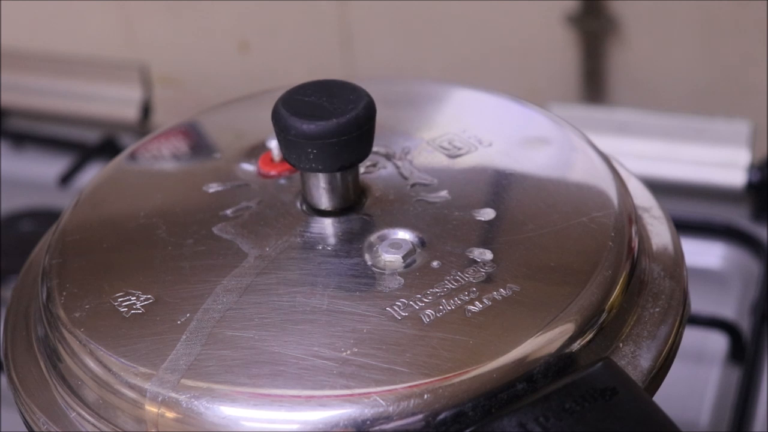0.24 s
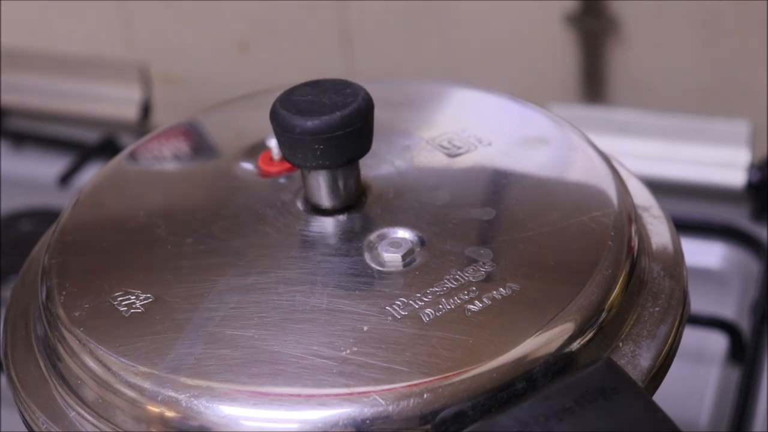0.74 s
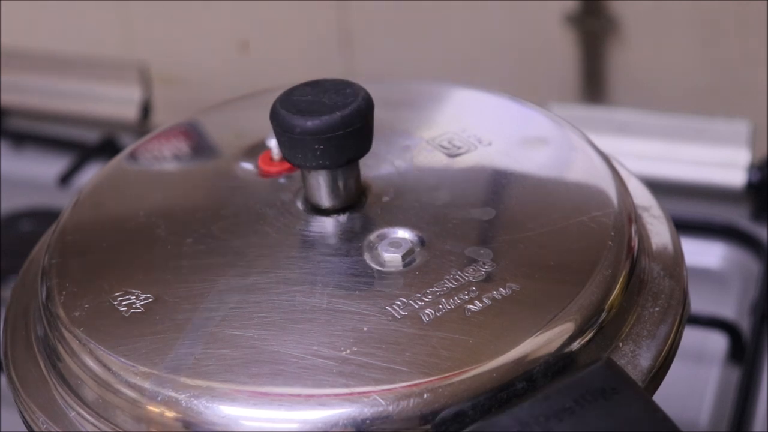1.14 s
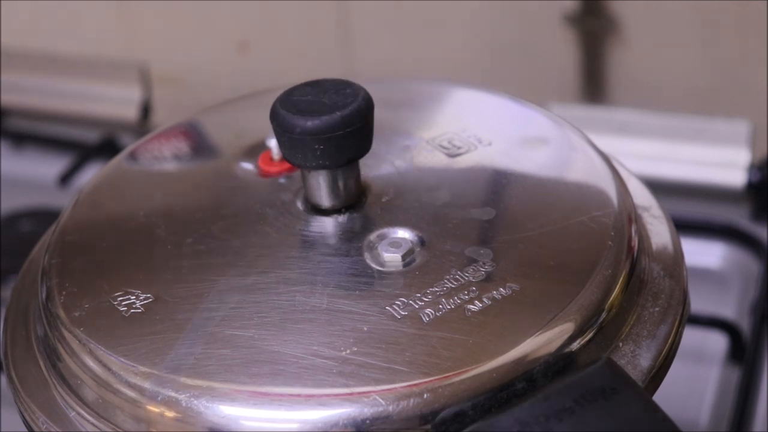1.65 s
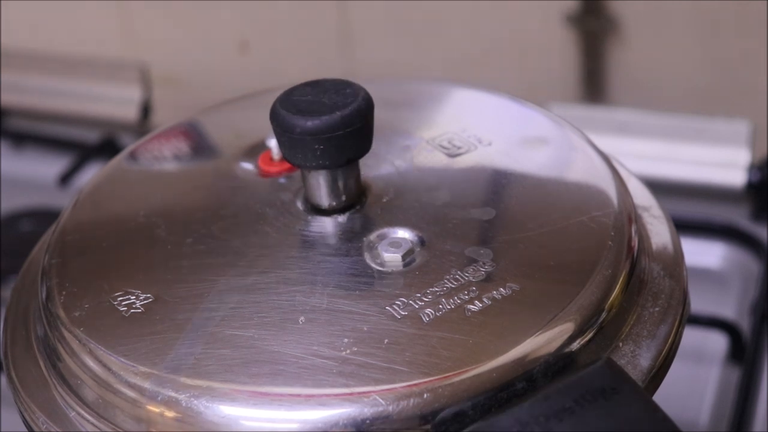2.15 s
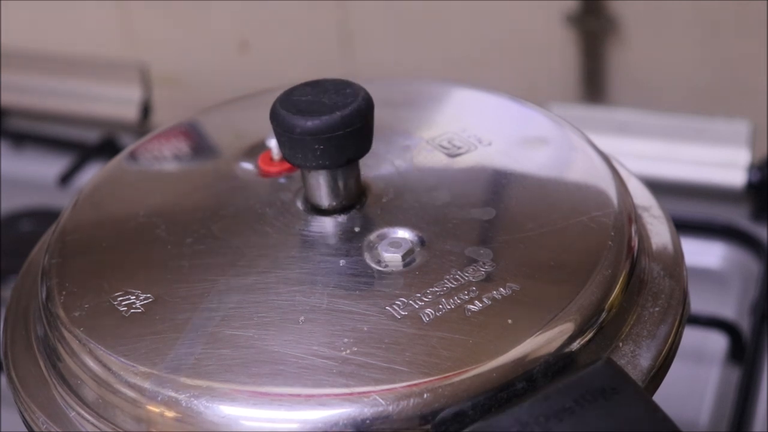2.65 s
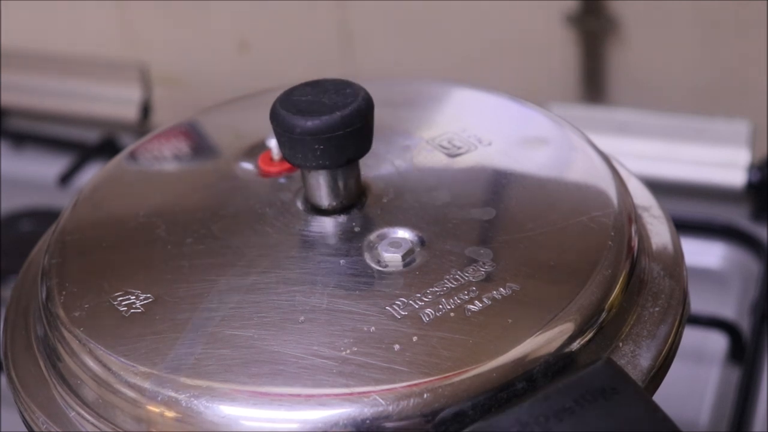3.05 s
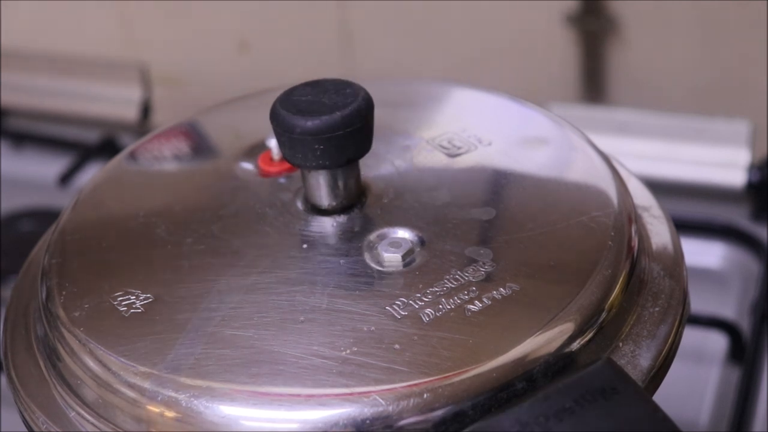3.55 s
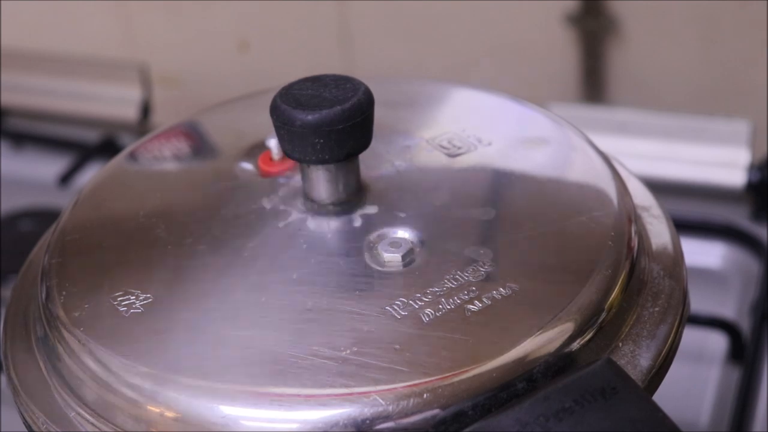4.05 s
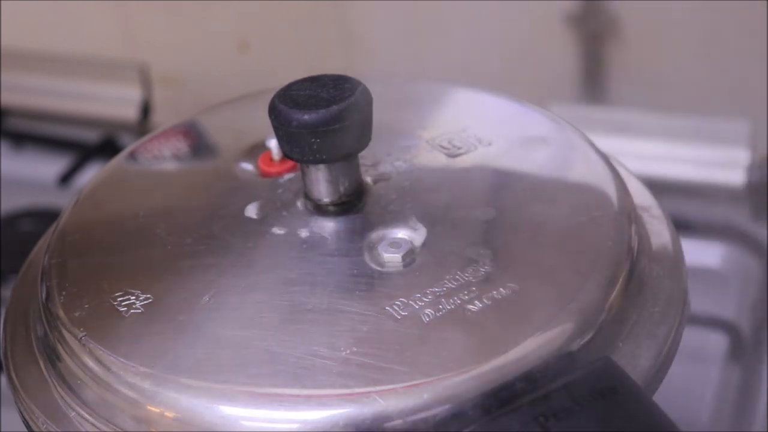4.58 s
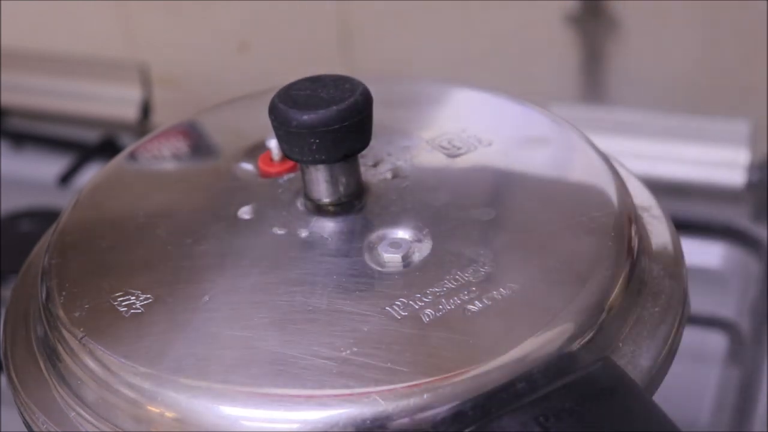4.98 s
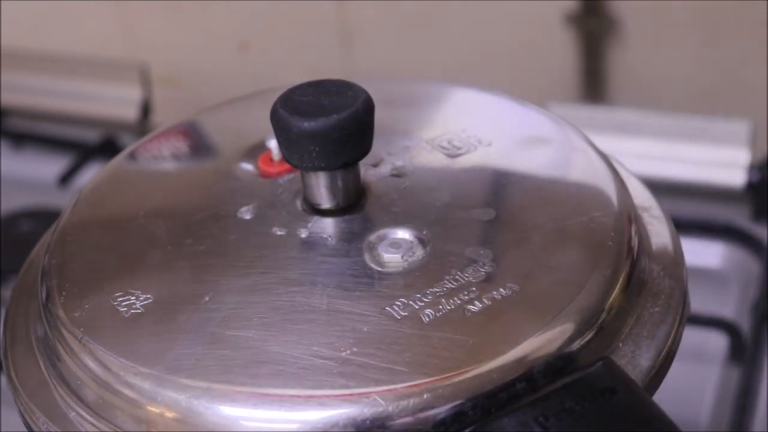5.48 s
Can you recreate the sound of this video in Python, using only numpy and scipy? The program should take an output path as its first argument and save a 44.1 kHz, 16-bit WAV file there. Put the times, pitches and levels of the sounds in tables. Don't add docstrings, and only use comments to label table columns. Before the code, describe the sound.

In a small tiled kitchen, burner roar, fan hum and faint simmer play briefly before a loud steam hiss cuts in abruptly. It flutters as the pressure cooker weight rocks rapidly. The weight lifts with a clunk and low thump, releasing a wet, fuller blast while the background ducks. It then drops, rattles lightly on the lid, and the hiss shrinks to a thin leak. Close stereo microphone.

```python
import sys
import numpy as np
from scipy import signal
from scipy.fft import rfft, irfft
from scipy.io import wavfile
from scipy.ndimage import uniform_filter1d

SR = 44100
rng = np.random.default_rng(int(sys.argv[2]) if len(sys.argv) > 2 else 0)


def magnitude_from_level(level_db):
    exponent = np.asarray(level_db, float) / 20
    return 10 ** exponent


def pcm_store(signal):
    levels = np.round(np.clip(np.atleast_2d(signal), -1, 1) * 32767)
    wavfile.write(sys.argv[1], SR, levels.astype(np.int16).T)


N = 252252
HOP = 128
SCENE_CHANGE_S = 0.3925


def evened(x):
    return x / np.sqrt(np.mean(x ** 2) + 1e-20)


def read(points, hz):
    f, value = np.transpose(points)
    return np.interp(np.log(hz + 1), np.log(f + 1), value)


def curve(points, t):
    return np.interp(t, *np.transpose(points))


def ramp(t, start_s, length_s):
    return np.clip((t - start_s) / length_s, 0, 1)


def bumps(rows, t):
    return sum(height * np.exp(-0.5 * ((t - s) / length) ** 2) for s, height, length in rows)


def kitchen_echo(x, t60, gap_s=0.003):
    slots = np.arange(0, SR // 2, 20)
    at = slots + rng.integers(0, 20, (2, len(slots)))
    taps = np.zeros((2, SR // 2 + 20))
    np.put_along_axis(taps, at, rng.choice([-1.0, 1.0], at.shape), 1)
    t = np.arange(taps.shape[1]) / SR
    taps *= magnitude_from_level(-60 * t / t60) * (t > gap_s)
    taps /= np.linalg.norm(taps, axis=1, keepdims=True)
    return signal.fftconvolve(x, taps, axes=1)[:, :N]


GRAB_S, GRAB_DB, GRABBING_S = 4.0, 14.5, 0.035
CREEP_DB, CREEP_S = 7.0, 0.35
FREE_S, RECOVER_DB_PER_S = 5.69, 130.0


def gain_control_db(t):
    held = GRAB_DB * ramp(t, GRAB_S, GRABBING_S) + CREEP_DB * ramp(t, GRAB_S, CREEP_S)
    return -np.minimum(held, RECOVER_DB_PER_S * np.maximum(FREE_S - t, 0))


# pitch_hz, level_db
KITCHEN_COLOUR = [(30, -15), (80, -6.5), (165, -8), (250, -4.5), (315, -10), (1090, -8.5), (1460, -1),
                  (1770, -11.5), (2600, -12), (5500, -8.5), (9500, -12.5), (10700, -11), (12200, -19),
                  (15900, -22.5)]
# pitch_hz, likeness (0-1)
KITCHEN_LIKENESS = [(60, 0.7), (180, 0.84), (550, 0.86), (1650, 0.27), (4970, 0.57), (15000, 0.03)]
# pitch_hz, level_db (rms)
FAN_HUM = [(100, -71), (200, -64.5), (272, -68), (393, -69.5)]
KITCHEN_DB = -44.5
DIP_DB, DIP_S = -3.0, 0.005


def kitchen(patchy_db=0.7):
    hz = np.fft.rfftfreq(2048, 1 / SR)
    a, b, c, d, patches = rng.standard_normal((N // 512 + 5, len(hz), 5)).T
    patches = evened(uniform_filter1d(uniform_filter1d(patches, size=12, axis=0), size=6, axis=1))
    same = np.clip(read(KITCHEN_LIKENESS, hz), -1, 1)[:, None]
    left = a + 1j * b
    right = same * left + np.sqrt(1 - same ** 2) * (c + 1j * d)
    lumpy_db = patchy_db + 2.0 * (hz[:, None] < 120)
    spectra = np.array([left, right]) * magnitude_from_level(read(KITCHEN_COLOUR, hz)[:, None] + lumpy_db * patches)
    roar = signal.istft(spectra, nperseg=2048, noverlap=1536)[1][:, :N]
    roar = magnitude_from_level(KITCHEN_DB) * evened(roar)

    t = np.arange(N) / SR
    waver = evened(uniform_filter1d(rng.standard_normal(N), size=6000))
    turns = np.cumsum(1 + 0.008 * waver) / SR
    hum = sum(magnitude_from_level(db) * np.sqrt(2) * np.sin(2 * np.pi * f * turns) for f, db in FAN_HUM)
    pull_db = gain_control_db(t)
    dip_db = bumps([(SCENE_CHANGE_S - DIP_S, DIP_DB, DIP_S)], t)
    return (roar + hum * magnitude_from_level(0.4 * pull_db)) * magnitude_from_level(pull_db + dip_db)


LIFT_S, FLOAT_S = 3.98, 0.16
DROP_S, FALL_S = 5.43, 0.185


def lift_at(t):
    rise = 1 - np.exp(-np.maximum(t - LIFT_S, 0) / FLOAT_S)
    return rise - 2 * ramp(t, DROP_S, FALL_S)


# time_s, level_db
STEAM_PRESSURE = [(.39, -26), (.8, -27), (1.6, -26), (2.13, -27), (2.3, -25.5), (2.45, -27), (2.7, -26),
                  (3.75, -26), (4.45, -25), (4.65, -26), (4.95, -25), (5.47, -25)]
BURST_S, BURST_DB, BURST_RISE_S, BURST_FADE_S = 4.005, 4.0, 0.025, 0.046
CLOSE_S, CLOSING_S, SHUT_DB = 5.472, 0.054, -9.5


def jet_db(t):
    fade = np.exp(-np.maximum(t - BURST_S, 0) / BURST_FADE_S)
    burst = ramp(t, BURST_S - BURST_RISE_S, BURST_RISE_S) * fade
    return curve(STEAM_PRESSURE, t) + BURST_DB * burst + SHUT_DB * ramp(t, CLOSE_S, CLOSING_S)


# pitch_hz, width_hz, rocking_db, floating_db
ECHO_RIDGES = [(3950, 91, 0.5, 2.), (4960, 86, 1, 1.5), (5340, 150, 2.5, 2.5), (5770, 190, 4.5, 2.),
               (6220, 200, 4.5, 4), (6620, 115, 3.5, .5), (6960, 37, 2.5, 1), (7500, 100, -3.5, 3),
               (7350, 74, 5, 0.5), (7940, 155, 3.5, 6), (10060, 300, 0.5, 2), (11450, 78, -1, 2)]


def ridged(x, column):
    hz = np.fft.rfftfreq(N, 1 / SR)
    ridges_db = sum(row[column] / (1 + ((hz - row[0]) / (row[1] / 2)) ** 2) for row in ECHO_RIDGES)
    return evened(irfft(rfft(x) * magnitude_from_level(ridges_db), N))


def cells(count):
    frames = N // HOP + 6
    a, b = rng.standard_normal((frames, 2 * HOP + 1, count, 2)).T
    return np.arange(frames) * HOP / SR, np.fft.rfftfreq(4 * HOP, 1 / SR), a + 1j * b


def sound(z):
    return signal.istft(z, nperseg=4 * HOP, noverlap=3 * HOP)[1][..., :N]


# pitch_hz, level_db (per Hz)
ROCKING_COLOUR = [(200, -62), (350, -29), (850, -21.5), (1300, -17), (2000, -11.5), (3200, -7.5),
                  (4300, -7), (6100, -2.5), (7800, -2.5), (9400, -7), (10700, -6), (12800, -17),
                  (14500, -18), (15900, -20)]
FLOATING_COLOUR = [(200, -58), (450, -38.5), (900, -28), (1440, -19), (2360, -8), (3500, -3.5), (5000, -3),
                   (6900, -4), (7800, -3.5), (8850, -4.5), (11700, -2.5), (12500, -7.5), (13400, -10.5),
                   (15900, -15)]
SHUT_COLOUR = [(500, -36), (1100, -27), (2050, -18), (3500, -12), (5350, -10), (6500, -7.5), (8000, -9),
               (10500, -13.5), (12500, -22), (15900, -36)]
# first_s, last_s, period_s, swell_db
ROCKING_BOUTS = [
    (.552, .92, .0695, 1.2),
    (.978, 1.22, .075, 1.9),
    (1.256, 1.37, .089, 1.6),
    (1.483, 2.05, .067, .7),
    (2.234, 2.5, .076, .9),
    (2.612, 3.13, .0702, 2.2),
    (3.181, 3.65, .0735, 2.),
    (3.76, 3.8, .075, .8),
    (3.834, 3.95, .084, 2.5),
]
# centre_s, swell_db, length_s
WATER_SPURTS = [
    (4.01, 0, .03),
    (4.262, 4, 0.0023),
    (4.315, 1.5, 0.0087),
    (4.62, 2.5, 0.013),
    (4.73, 1.5, .008),
    (5.442, -0.5, .006),
    (5.481, 7.5, 0.0018),
]
# centre_s, level_db, length_s
LIFT_SPLUTTER = [
    (4.015, 2, 0.015),
    (4.095, 5.5, 0.027),
    (4.19, 2.5, 0.061),
]
# time_s, pitch_hz
VENT_WHISTLE = [(4.2, 3600), (4.6, 3670), (5.0, 3770), (5.45, 4120)]
# pitch_hz, share (0-1)
STRAIGHT_WHEN_ROCKING = [(300, 0.37), (1400, 0.93), (2300, 0.67), (3200, 0.78), (6000, 0.6), (8000, 0.5),
                         (9200, 0.17), (15000, 0)]
STRAIGHT_WHEN_FLOATING = [(300, 1), (1400, 0.84), (2300, 0.53), (3200, 0.78), (7000, 0.33), (10000, 0.67),
                          (15000, 0.82)]
# pitch_hz, lead_rad
LEFT_LEAD = [(300, 0.88), (1900, -0.51), (2600, 0.13), (6500, 0.52), (10000, 1), (15700, 1.4)]
# pitch_hz, left_minus_right_db
LEFT_LEAN = [(60, -0.5), (150, 0.0), (380, 2.5), (950, 2.5), (2380, -3.0), (5980, -1), (15000, 0.5)]
# time_s, extra_left_minus_right_db
PLUME_DRIFT = [(.4, -1.3), (1.2, -1.5), (2.2, -1.5), (3.2, -0.9), (3.7, -1.5), (4.7, -1), (5.2, -1.5),
               (5.7, .5)]


def steam(rock_depth=1.26, rock_s=0.013, patchy_db=0.77, flicker_db=0.54, ringing=0.13):
    t, hz, (jet, other_left, other_right, chance) = cells(count=4)
    lift = lift_at(t)
    up, shut = np.clip(lift, 0, 1), np.clip(-lift, 0, 1)
    rocking = read(ROCKING_COLOUR, hz)[:, None]
    floating = read(FLOATING_COLOUR, hz)[:, None]
    closed = read(SHUT_COLOUR, hz)[:, None]
    colour_db = rocking + up * (floating - rocking) + shut * (closed - rocking)
    colour_db -= 10 * np.log10(np.mean(magnitude_from_level(colour_db) ** 2, axis=0))

    wet_band = np.exp(-np.log((hz + 1) / 1600) ** 2 / 0.98)
    wet_db = np.outer(wet_band, bumps(LIFT_SPLUTTER, t))
    vent_db = 2.6 * up / (1 + ((hz[:, None] - curve(VENT_WHISTLE, t)) / 220) ** 2)
    puffs = []
    for first, last, period, swell_db in ROCKING_BOUTS:
        puffs += [(s, swell_db, rock_s) for s in np.arange(first, last, period)]
    puffs_db = rock_depth * bumps(puffs, t)
    puffs_db = puffs_db - uniform_filter1d(puffs_db, size=50) + bumps(WATER_SPURTS, t)
    reach = np.clip(np.log(hz + 1)[:, None] / 2.0 - 3.3, 0, 1)
    patches = evened(uniform_filter1d(uniform_filter1d(chance.real, size=8, axis=0), size=24, axis=1))
    flicker = evened(uniform_filter1d(chance.imag, size=3, axis=1).mean(0))
    moving_db = reach * (puffs_db + flicker_db * flicker) + patchy_db * patches
    gain = magnitude_from_level(colour_db + wet_db + vent_db + moving_db)

    low = read(STRAIGHT_WHEN_ROCKING, hz)[:, None]
    high = read(STRAIGHT_WHEN_FLOATING, hz)[:, None]
    share = np.clip((low + up * (high - low)) * (1 - 0.94 * shut), 0, 1)
    port = magnitude_from_level(read(LEFT_LEAN, hz) / 4) ** 2 * np.exp(0.5j * read(LEFT_LEAD, hz))
    ports = np.array([port, 1 / port])[:, :, None]
    straight = sound(ports * np.sqrt(share) * gain * jet)
    rung = np.minimum(np.clip(ringing, 0, 1), 1 - share)
    walls = kitchen_echo(sound(np.sqrt(rung) * abs(ports) * gain * jet), t60=0.2)
    sideways = abs(ports) * gain * np.array([other_left, other_right])
    scattered = sound(np.sqrt(1 - share - rung + 1e-9) * sideways)
    arriving = straight + walls + scattered

    time = np.arange(N) / SR
    afloat = np.interp(time, t, up)
    heard = (1 - afloat) * ridged(arriving, column=2) + afloat * ridged(arriving, column=3)
    heard = heard * magnitude_from_level(np.outer([0.5, -0.5], curve(PLUME_DRIFT, time)))
    shown = np.clip((time - SCENE_CHANGE_S) / 0.0018 + 0.5, 0, 1)
    return heard * magnitude_from_level(jet_db(time) + 1.5) * shown


RATTLE_S, RATTLE_GAP_S, RATTLE_DB = 5.54, 0.0185, -45.5
LID_HZ, LID_T60_S = 597, 0.07


def rattle(uneven=0.3, spread_db=1.5, detune=0.09):
    a, b, c = rng.uniform(-1, 1, (12, 3)).T
    at = RATTLE_S + RATTLE_GAP_S * (np.arange(len(a)) + uneven * a)
    return list(zip(at, RATTLE_DB + spread_db * b, LID_HZ * (1 + detune * c), LID_T60_S + 0 * a))


# start_s, level_db (peak), pitch_hz, t60_s
WEIGHT_KNOCKS = [
    (3.979, -38, 555, 0.078),
    (3.987, -39, 398, 0.066),
    (3.992, -35, 620, 0.06),
    (4.002, -46, 330, 0.052),
    (5.472, -45, 630, .04),
    (5.52, -41.5, 590, 0.055),
]
# centre_s, level_db (rms), length_s, low_hz, top_hz
LIFT_THUMPS = [
    (3.992, -49, 0.011, 70, 240),
    (4.038, -49, 0.0055, 300, 900),
    (4.085, -61, 0.022, 170, 320),
    (4.1, -50.5, 0.05, 500, 1290),
]


def weight():
    t, out = np.arange(N) / SR, np.zeros(N)
    for s, db, hz, t60 in WEIGHT_KNOCKS + rattle():
        age = np.maximum(t - s, 0)
        ring = np.sin(2 * np.pi * hz * age)
        ring += 0.23 * np.sin(2 * np.pi * 1.68 * hz * age)
        ring += 0.26 * np.sin(2 * np.pi * 0.86 * hz * age)
        out += magnitude_from_level(db - 60 * age / t60) * (1 - np.exp(-age / 0.0017)) * ring
    air = rng.standard_normal(N)
    for s, db, length, low_hz, top_hz in LIFT_THUMPS:
        band = signal.butter(3, [low_hz, top_hz], "band", fs=SR, output="sos")
        out += magnitude_from_level(db) * evened(signal.sosfilt(band, air)) * bumps([(s, 1, length)], t)
    return out + magnitude_from_level(-8) * kitchen_echo(np.array([out, out]), t60=0.1)


def scene():
    return kitchen() + steam() + weight()


def top_cut(x):
    return signal.sosfilt(signal.butter(12, 15750, fs=SR, output="sos"), x)


def record(dry):
    edge = signal.firwin(401, 16000, window=("kaiser", 9), fs=SR)
    mix = signal.oaconvolve(dry, edge[None], "same", axes=1)
    return top_cut(mix)


dry = scene()
out = record(dry)
pcm_store(out)
```